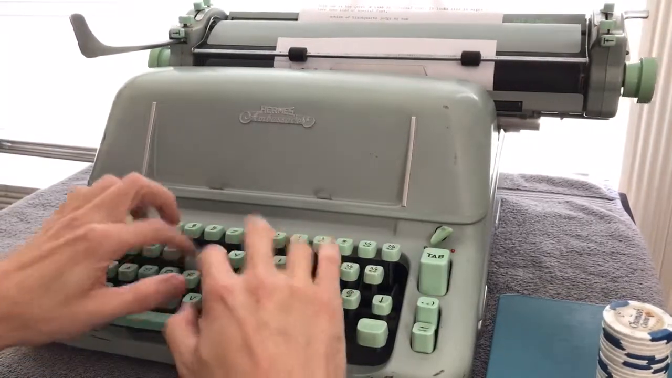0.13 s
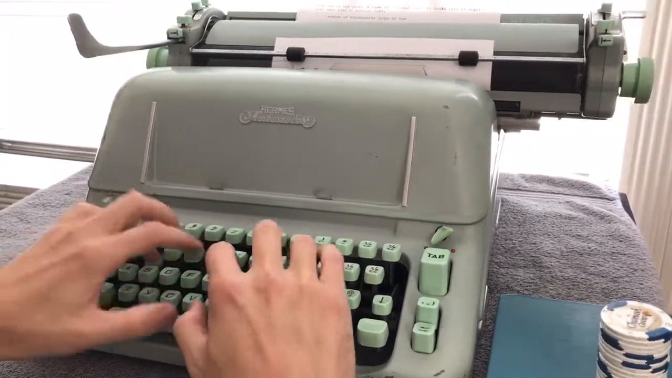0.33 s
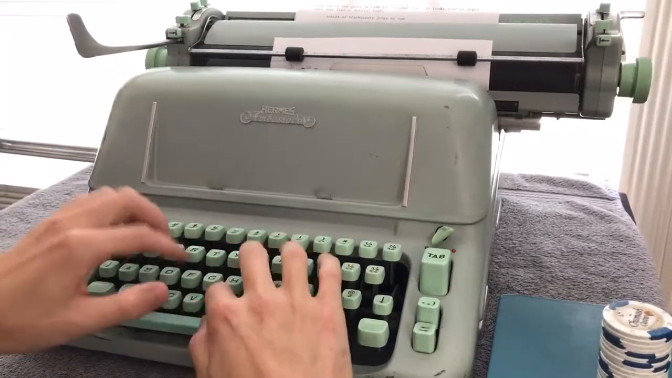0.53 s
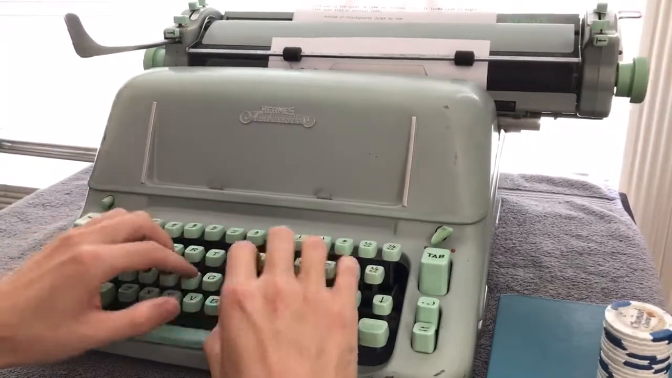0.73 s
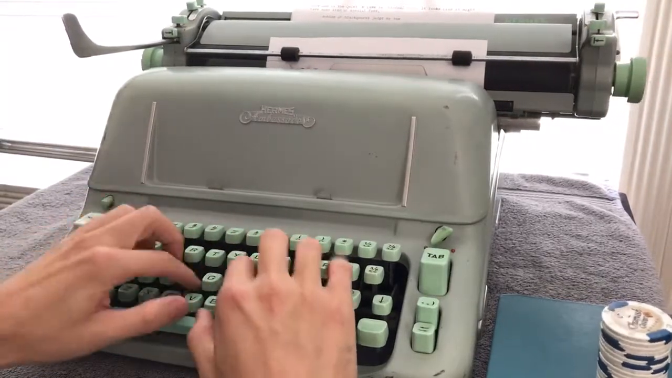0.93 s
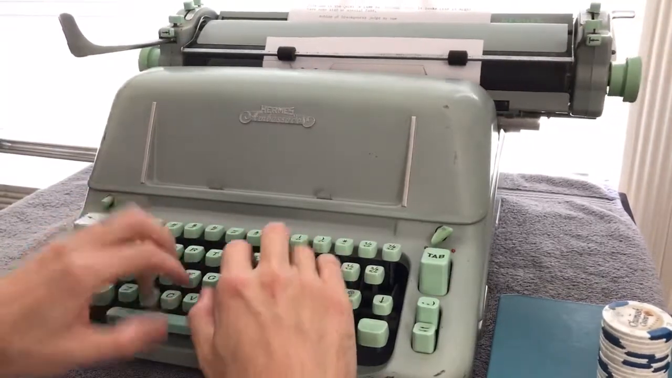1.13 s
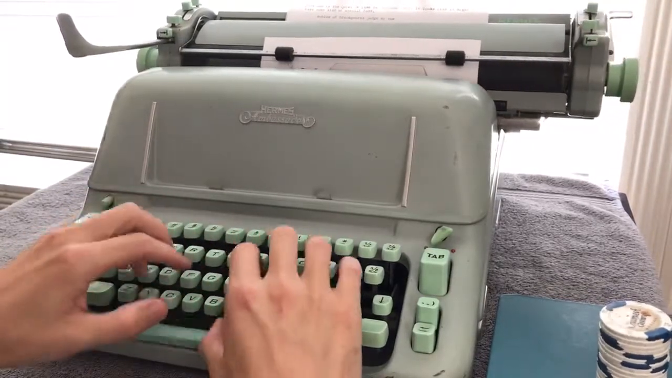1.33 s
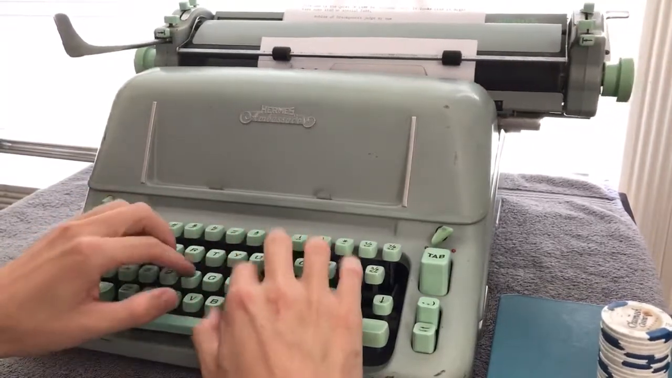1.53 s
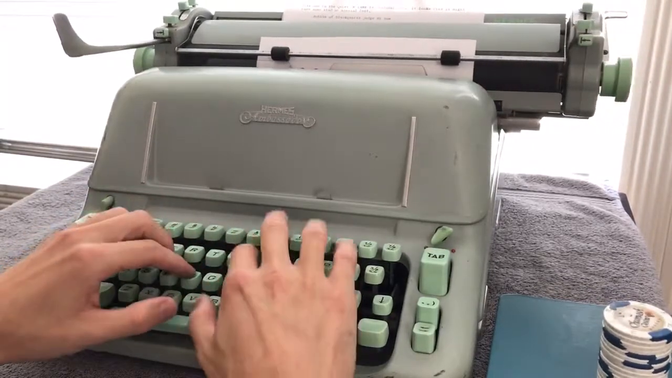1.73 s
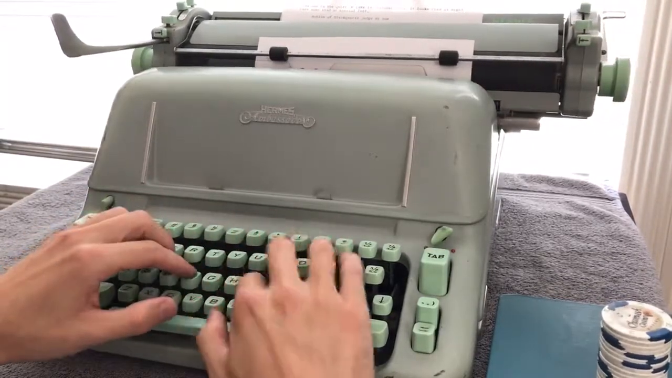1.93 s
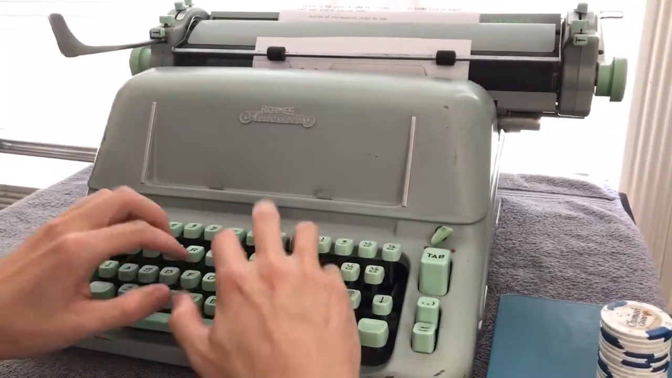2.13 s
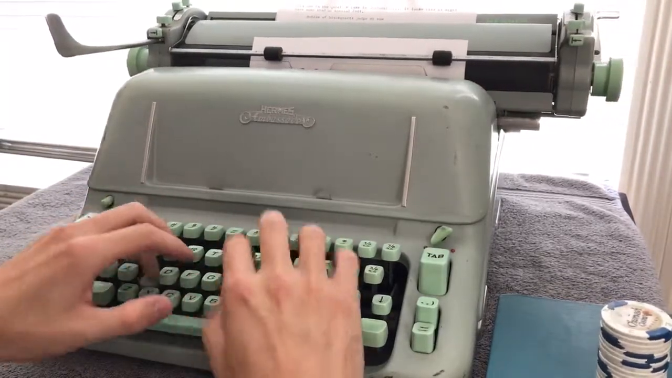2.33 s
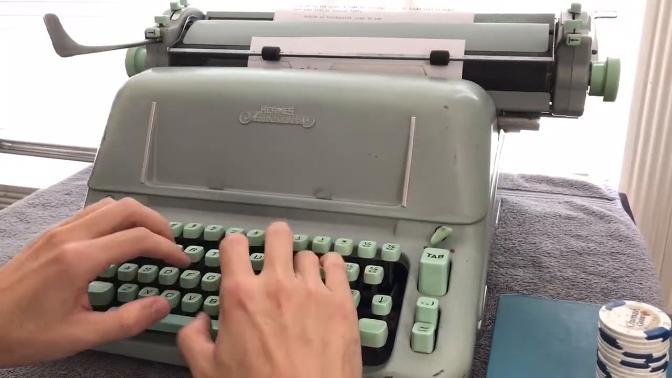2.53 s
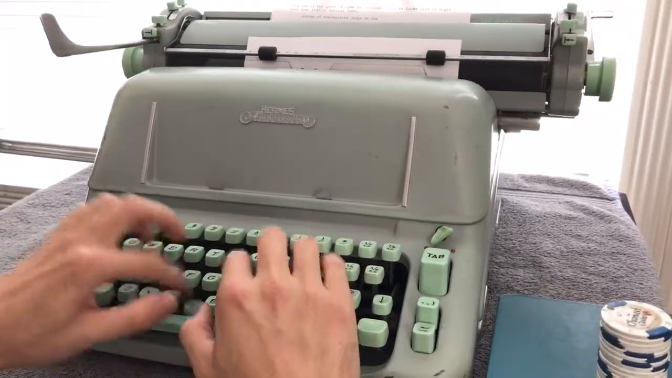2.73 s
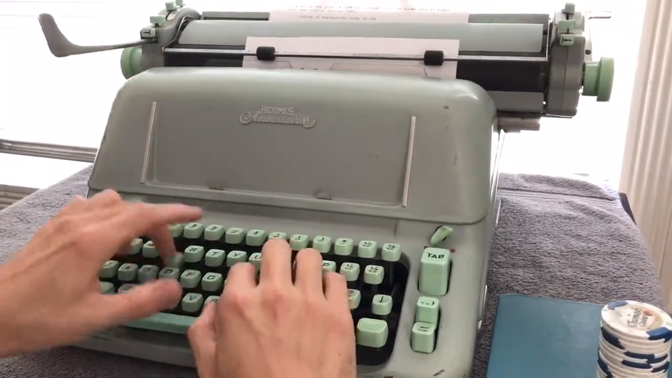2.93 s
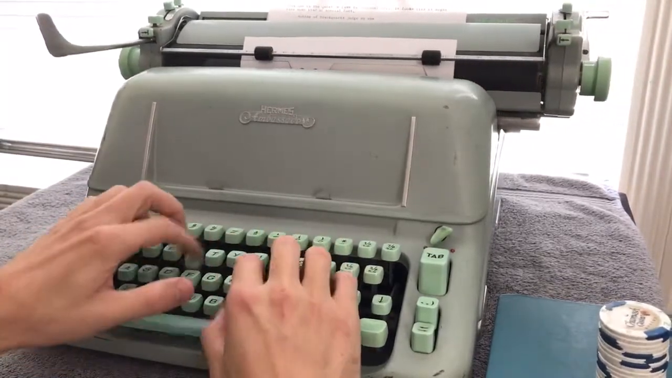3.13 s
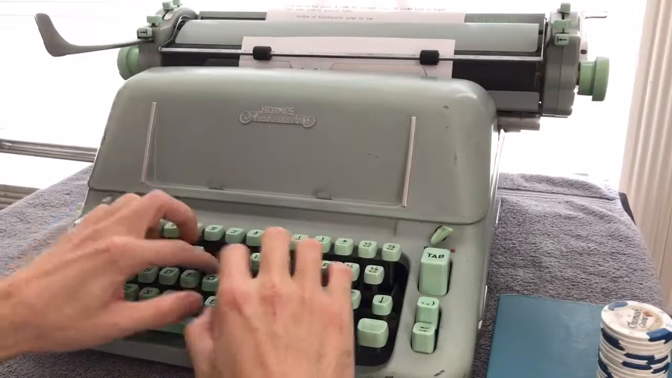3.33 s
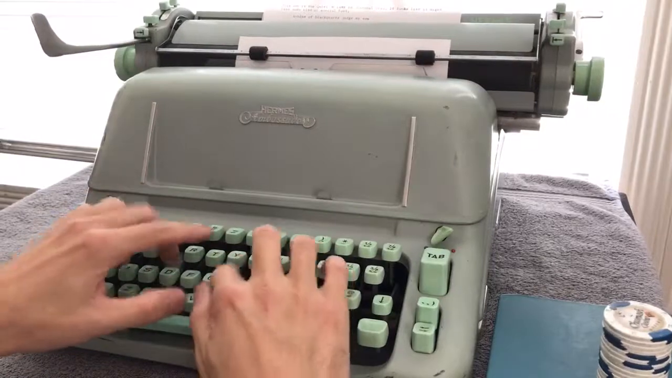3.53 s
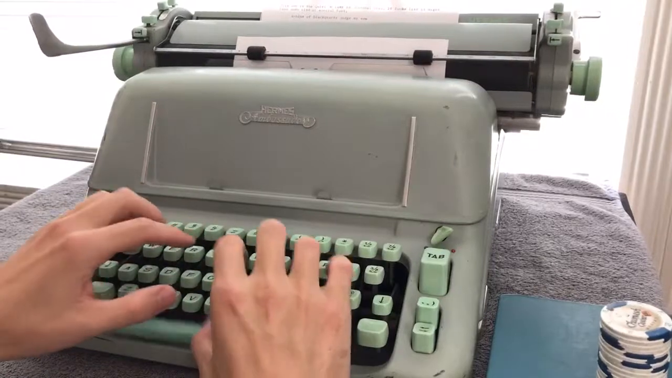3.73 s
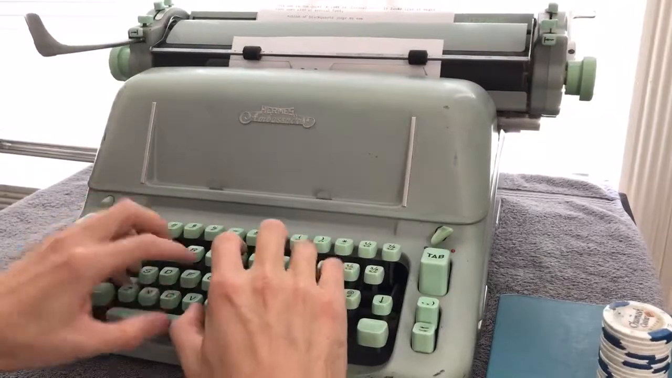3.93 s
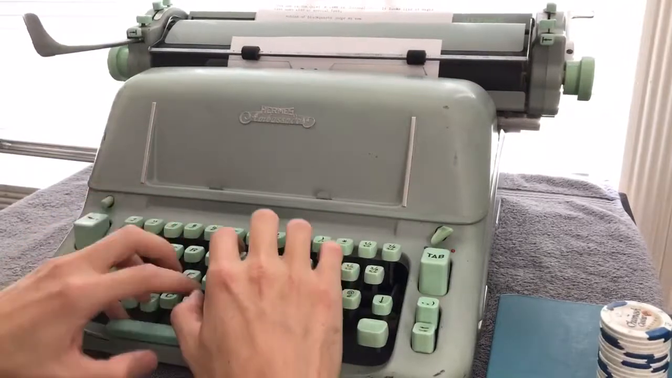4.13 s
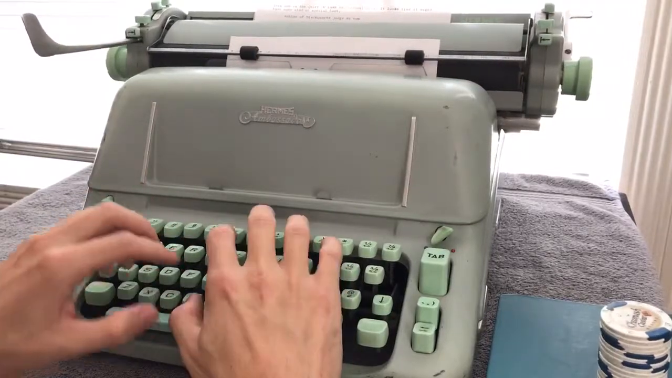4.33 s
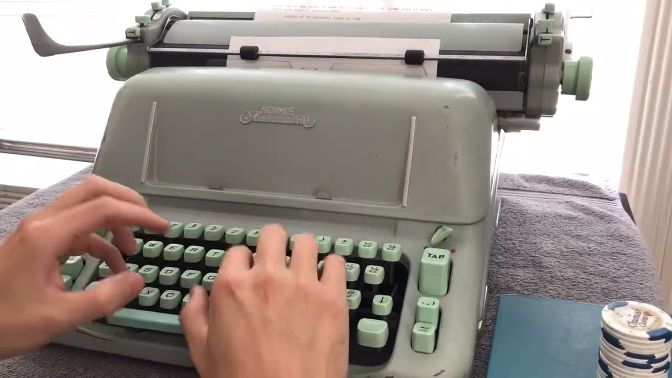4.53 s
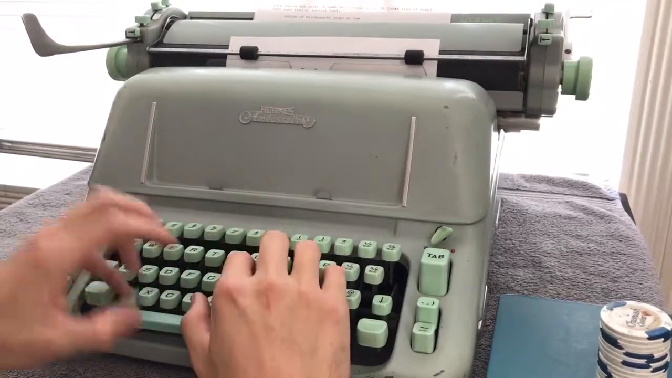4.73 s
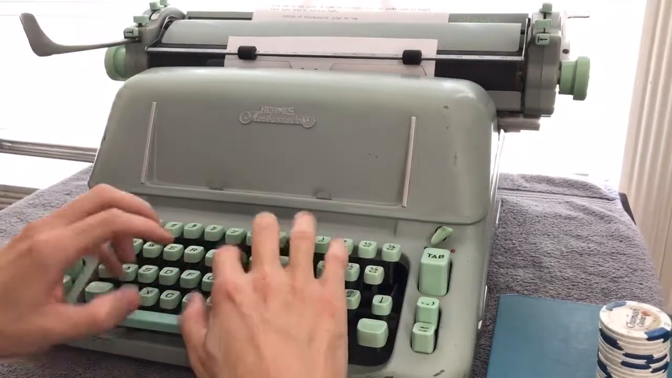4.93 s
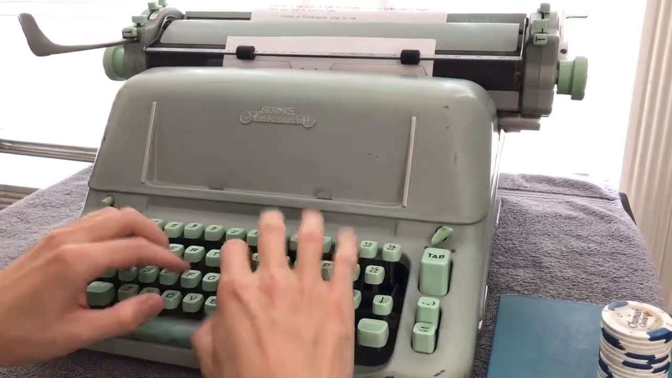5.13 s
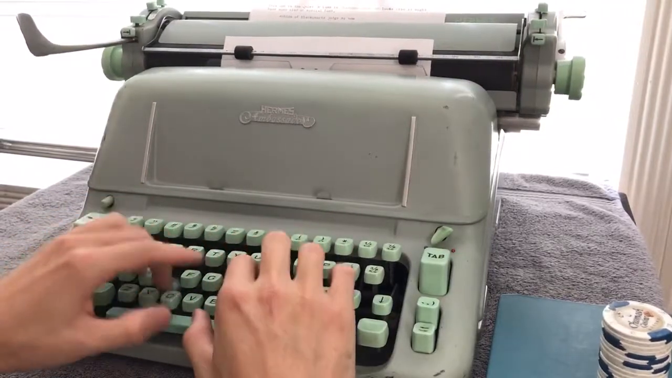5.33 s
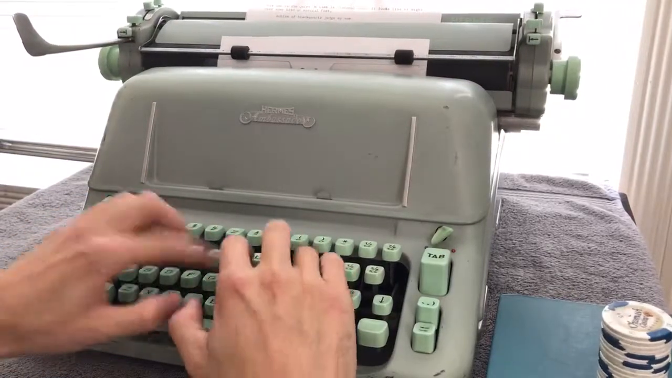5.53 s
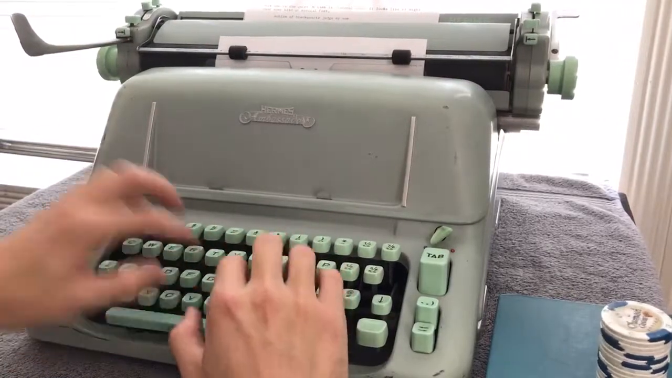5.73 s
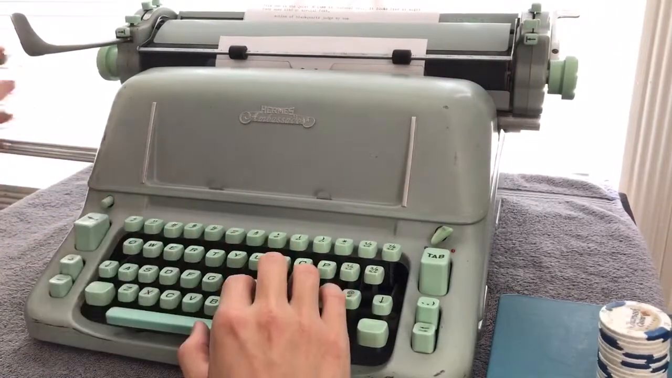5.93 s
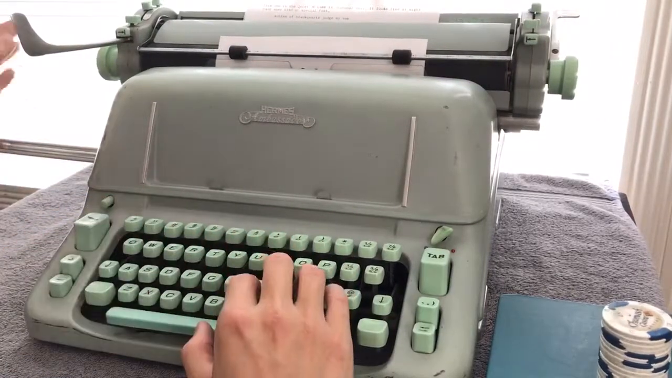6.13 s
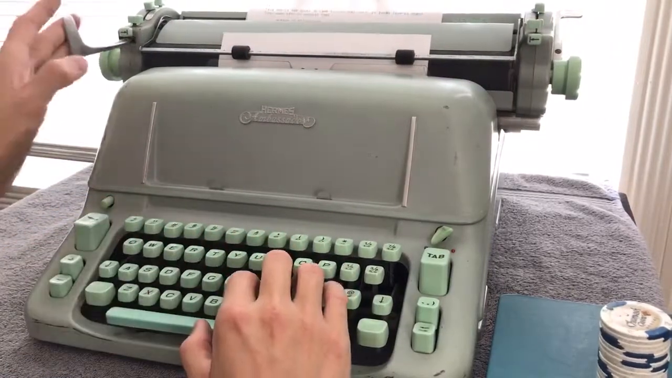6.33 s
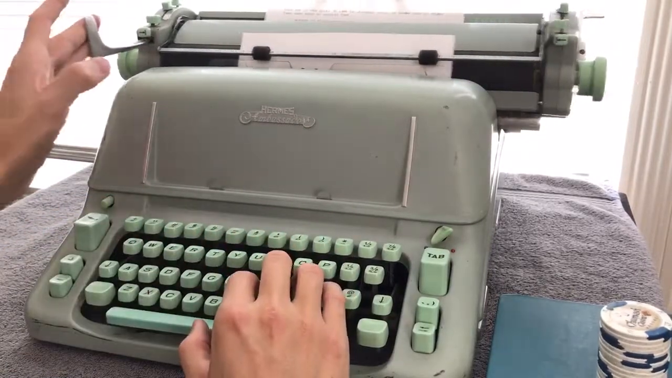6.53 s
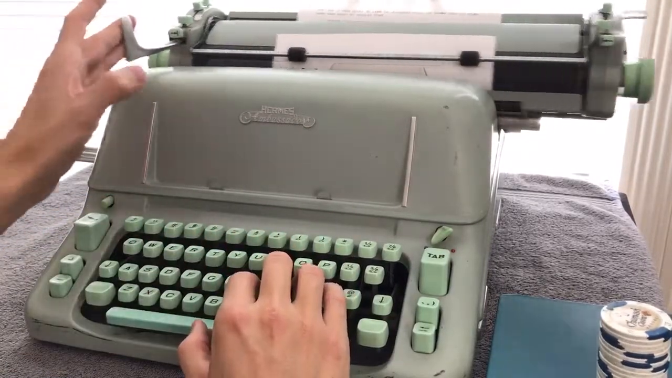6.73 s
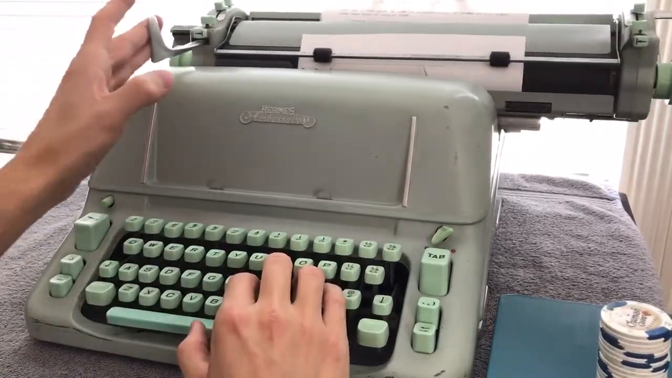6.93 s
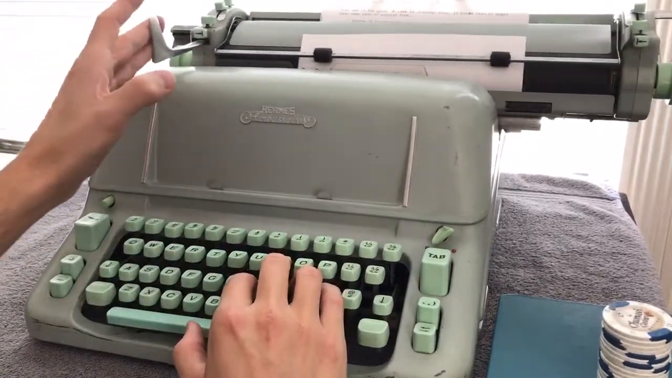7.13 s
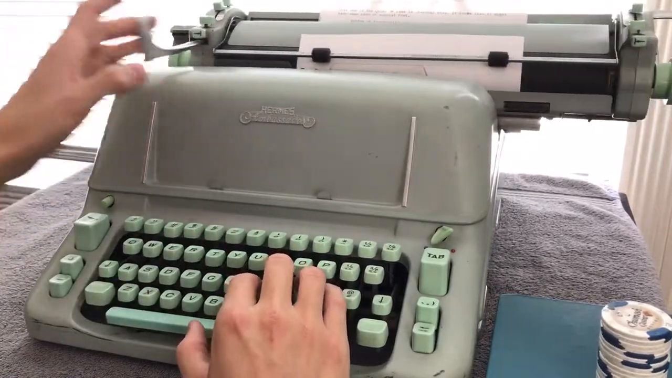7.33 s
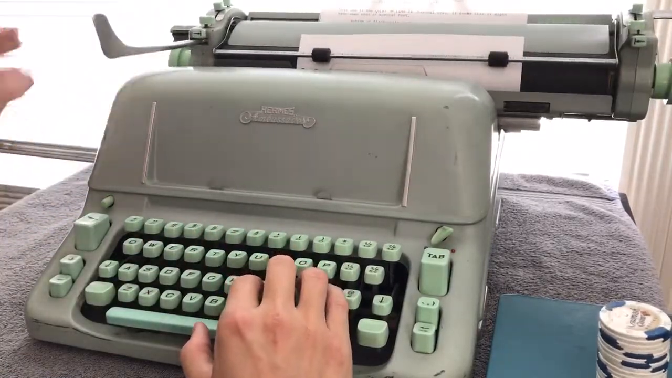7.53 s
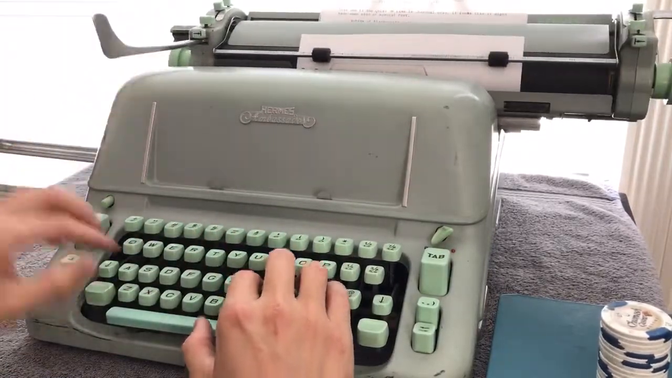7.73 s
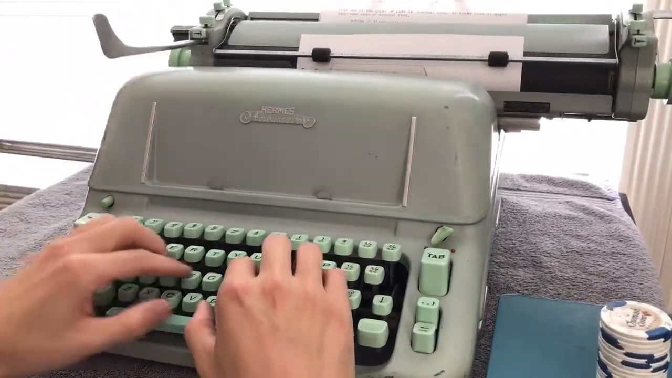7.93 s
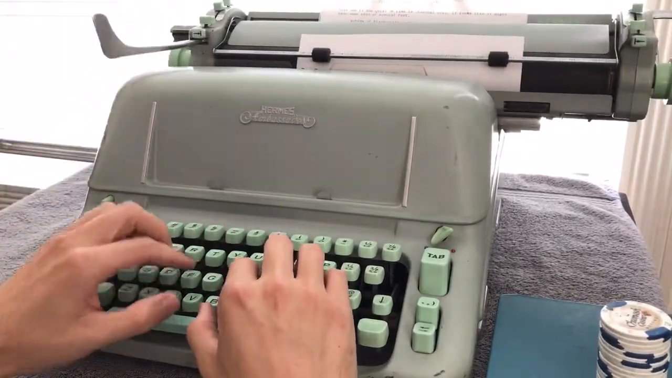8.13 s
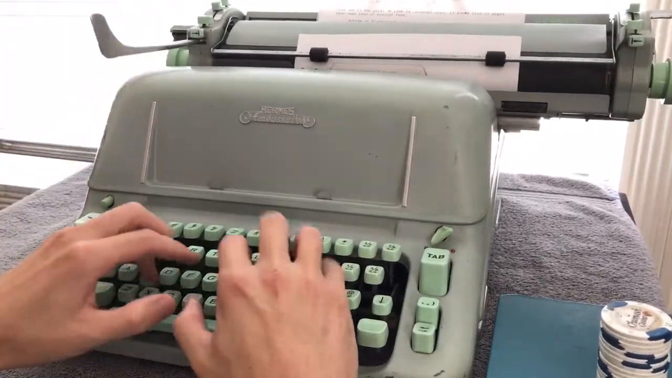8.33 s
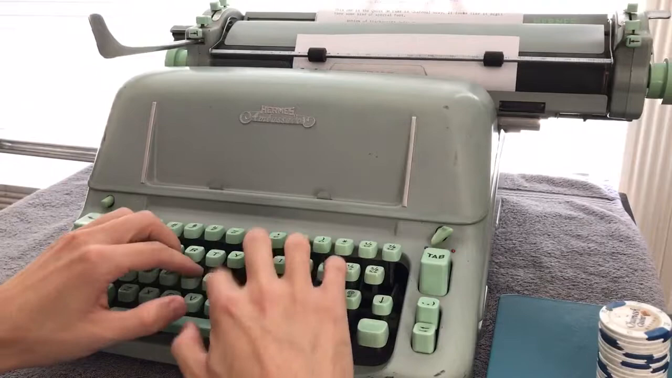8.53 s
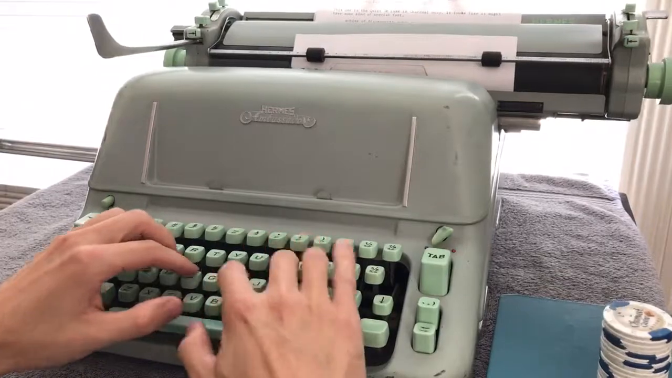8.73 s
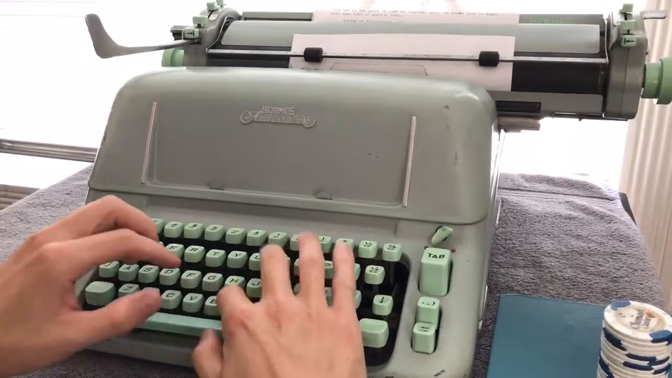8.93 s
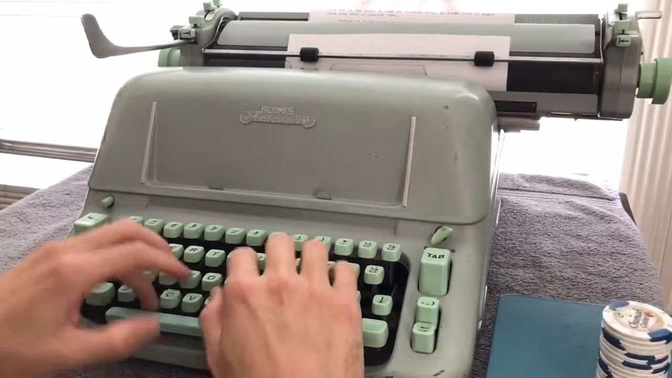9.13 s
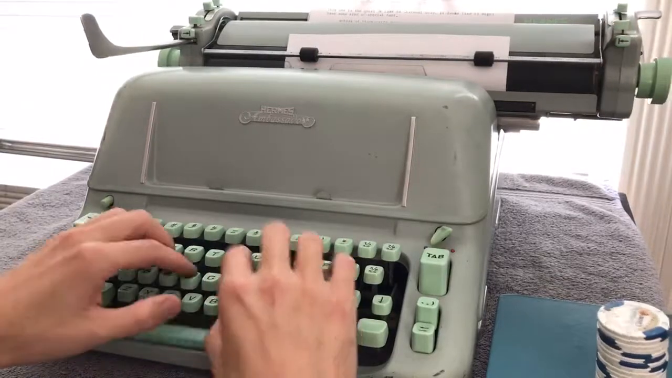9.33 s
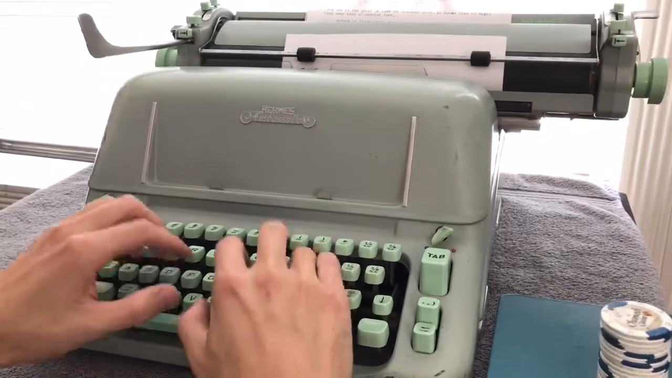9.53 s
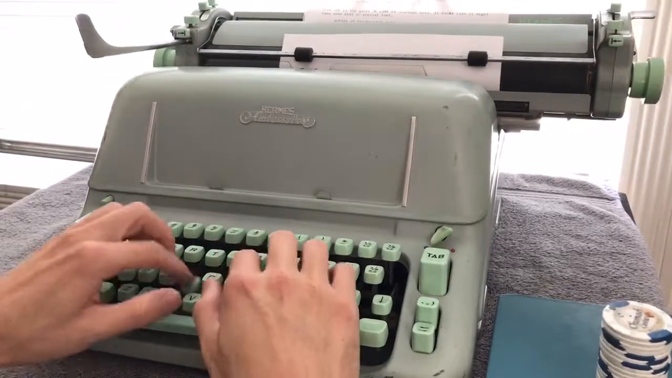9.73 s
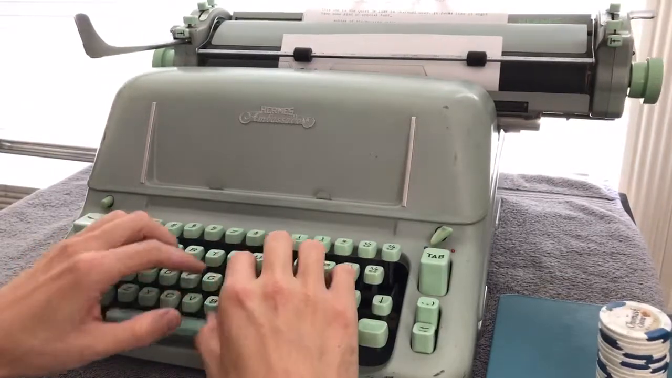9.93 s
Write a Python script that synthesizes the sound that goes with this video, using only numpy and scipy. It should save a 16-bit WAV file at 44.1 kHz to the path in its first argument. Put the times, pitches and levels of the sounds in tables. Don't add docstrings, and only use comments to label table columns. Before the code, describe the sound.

A heavy manual typewriter, closely miked in a small room. Rapid, uneven typebar cracks hit the platen, each bright and steely with a brief frame rattle and low case thud. Softer space-bar clunks sit between words. Typing stops for a lever clack, a short carriage whir and hard metal stops, then resumes with another quick burst over faint low room air.

```python
import sys
import numpy as np
from scipy import signal
from scipy.fft import rfft, irfft
from scipy.io import wavfile
from scipy.ndimage import uniform_filter1d

SR = 44100
rng = np.random.default_rng(int(sys.argv[2]) if len(sys.argv) > 2 else 0)


def linear_from_db(decibels):
    return 10 ** (np.asarray(decibels, float) / 20)


def transcribe(signal):
    frames = np.atleast_2d(signal).T
    limited = np.clip(frames, -1, 1)
    pcm = np.round(limited * 32767).astype(np.int16)
    wavfile.write(sys.argv[1], SR, pcm)


N = 440559

# start_s, peak_db, bar_pitch_hz, platen_knock_db (under the peak)
FIRST_LINE = [(0.0004, -5.5, 4320, -21), (0.1222, -4, 4320, -25), (0.27, -1.5, 4320, -19),
              (0.4313, -1, 4320, -23), (0.6171, -3.5, 4320, -18.5), (1.019, -0.5, 4320, -19),
              (1.1462, -2, 4320, -17.5), (1.272, -1.5, 4320, -17.5), (1.5817, -2, 4320, -15.5),
              (1.7943, 1, 4100, -17), (2.009, -2.5, 4040, -15.5), (2.1852, 0.5, 4080, -17.5),
              (2.3348, -2.5, 4030, -17.5), (2.6191, -3, 4000, -13.5), (2.7337, 1.5, 5800, -20),
              (2.9379, -1.5, 5400, -16.5), (3.1104, -0.5, 5240, -17.5), (3.4105, -3, 3920, -16.5),
              (3.5324, -3.5, 5400, -18.5), (3.6415, -2, 5300, -19.5), (3.916, -4, 5220, -14.5),
              (4.0013, -0.5, 5360, -19.5), (4.866, -2, 5170, -18), (5.066, -1, 5200, -17),
              (5.436, -0.5, 5270, -21), (5.5546, -4, 5080, -15), (5.683, -0.5, 5060, -20.5)]
# start_s, peak_db, bar_pitch_hz, platen_knock_db (under the peak)
SECOND_LINE = [(8.333, -4, 5140, -16.5), (8.4624, -4.5, 5300, -23), (8.6385, -2.5, 4320, -19),
               (8.8142, -2, 5250, -19), (9.0127, -0.5, 4320, -20), (9.1493, -1.5, 4320, -19.5),
               (9.5798, -1, 4320, -19.5), (9.7253, -3, 4320, -22.5)]
STROKES = FIRST_LINE + SECOND_LINE
# press_s, press_db, spring_back_s, return_db, shake_s
SPACES = [(0.799, -33.5, 0.8974, -26.5, 0.044), (1.4155, -32.5, 1.512, -24.5, 0.052),
          (2.466, -33.5, 2.5571, -22.5, 0.041), (3.263, -35, 3.372, -25.5, 0.05),
          (3.763, -35, 3.8496, -24.5, 0.047), (4.182, -30, 4.2872, -30, 0.08),
          (5.234, -34.5, 5.3323, -24, 0.053), (9.3955, -35, 9.4729, -25, 0.052)]
# pitch_hz, width_hz, level_db
CASE = [(155, 30, -10), (208, 22, -6), (258, 20, -2), (318, 20, 1), (402, 24, -3)]
# pitch_hz, width_hz, level_db
COVER = [(619, 110, -6.5), (809, 50, -2), (1078, 620, -9.5), (1300, 500, -12)]
# pitch_hz, level_db (per Hz)
RUSTLE = [(350, -15), (600, 0), (1040, -2), (2090, -3), (8960, -15.5), (10400, -21), (15000, -8.5),
          (15800, -17.5), (16500, -50)]
FRAME_T60_S = 0.37


def rms_one(x):
    return x / np.sqrt(np.mean(x ** 2) + 1e-20)


def coloured(x, spectrum):
    hz, level_db = np.transpose(spectrum)
    grid = np.fft.rfftfreq(len(x), 1 / SR) + 1
    gain = linear_from_db(np.interp(np.log(grid), np.log(hz), level_db))
    return rms_one(irfft(rfft(x) * gain, len(x)))


def resonate(x, modes, spread_db=0.):
    out, luck = 0, rng.standard_normal(len(modes))
    for k, (hz, width, level_db) in enumerate(modes):
        r = np.exp(-np.pi * width / SR)
        poles = [1, -2 * r * np.cos(2 * np.pi * hz / SR), r * r]
        ring = signal.lfilter([(1 - r * r) / 2, 0, (r * r - 1) / 2], poles, x + 1e-18)
        out = out + (-1) ** k * linear_from_db(level_db + spread_db * luck[k]) * ring
    return out


def grains(size, spread_db):
    strength_db = spread_db * np.minimum(rng.exponential(1, size), 4)
    return rms_one(rng.standard_normal(size) * linear_from_db(strength_db))


def lumps(size, per_s, depth_db):
    knots = rng.standard_normal(size // 40 + 2)
    return linear_from_db(depth_db * np.interp(np.arange(size) * per_s / SR, np.arange(len(knots)), knots))


def evened(x, window_s):
    return x / np.sqrt(uniform_filter1d(x ** 2, size=max(int(window_s * SR), 1)) + 1e-20)


def add(out, sound, s):
    at = int(round(s * SR))
    out[at:at + len(sound)] += sound[:N - at]


def in_time(rows, outside_db):
    s, level_db = np.transpose(rows)
    return np.interp(np.arange(N) / SR, s, level_db, outside_db, outside_db)


def air():
    # pitch_hz, level_db (per Hz)
    spectrum = [(41, -32), (70, 6.5), (156, -4.5), (219, -1), (560, -19), (628, -13.5), (885, -32),
                (8500, -36.5), (10400, -37.5), (15100, -31.5), (16500, -44.5)]
    return linear_from_db(-63.5) * coloured(rng.standard_normal(N), spectrum)


def room(x):
    # pitch_hz, t60_s
    decay = [(200, 1), (1000, 0.53), (4000, 0.39), (10000, 0.17), (16000, 0.067)]
    t, edges = np.arange(SR // 2) / SR, 80 * 2 ** np.arange(0, 8.1, .5)
    hz, t60 = np.transpose(decay)
    echo = np.zeros(len(t))
    for low, high in zip(edges, edges[1:]):
        half_octave = signal.butter(2, [low, high], "band", fs=SR, output="sos")
        band = signal.sosfilt(half_octave, rng.standard_normal(len(t)))
        echo += band * linear_from_db(-60 * t / np.interp(np.log(low * high) / 2, np.log(hz), t60))
    echo = echo * np.clip((t - .003) / 0.0064, 0, 1)
    return linear_from_db(-17) * signal.fftconvolve(x, echo / np.sqrt(np.sum(echo ** 2)))[:N]


def blows():
    # start_s, peak_db, shake_s
    bumps = [(0.177, -39, 0.017), (0.676, -38, 0.034), (1.002, -47, 0.031), (1.867, -35, 0.0076),
             (6.042, -52.5, 0.087), (6.325, -36, 0.035), (7.028, -38, 0.02), (7.381, -41, 0.022),
             (7.492, -31, 0.024), (8.028, -55, 0.023), (9.937, -38.5, 0.042)]
    bottoms = [(s + 0.00486, -34, 0.027, 2.5) for s, *_ in STROKES]
    fingers = [(s - 0.036, -45, .015, 6) for s, *_ in STROKES[1:]]
    down = [(s + .004, db, .03, 3.5) for s, db, *_ in SPACES]
    up = [(s + .007, db, shake_s, 1) for _, _, s, db, shake_s in SPACES]
    return bottoms + fingers + down + up + [(*bump, 4) for bump in bumps]


def desk():
    push = np.zeros(N)
    for s, *_ in STROKES:
        push_db = -34.0 + 4.9 * rng.standard_normal()
        add(push, linear_from_db(push_db) * np.diff(np.hanning(500)) * 60, max(s - .035, 0))
    for s, peak_db, *_ in blows():
        add(push, linear_from_db(peak_db - 2.5) * np.hanning(200), s)
    boom = resonate(resonate(push, [(48.3, 19, 3.5), (114, 17, -22.0)]), [(55.6, 120, 0)])
    hum = resonate(resonate(rng.standard_normal(N), [(55.6, 5.9, 0)]), [(55.7, 16, 0)])
    return boom + linear_from_db(-63) * evened(hum, window_s=0.31)


def hush():
    dip_db = np.zeros(N)
    for _, _, s, *_ in SPACES:
        add(dip_db, -8.0 * np.sin(np.linspace(0, 2.4, 3000)), s - .068)
    return linear_from_db(np.maximum(dip_db, -10))


def stroke(level_db, hold_s, t60):
    out, t = np.zeros(N), np.arange(SR // 2) / SR
    rise_s, lead_s = .04, .075
    fall = linear_from_db(level_db - 60 * np.maximum(t - rise_s - hold_s, 0) / t60)
    swell = np.minimum(t / rise_s, 1) ** 2 * fall
    for s, *_ in STROKES:
        add(out, swell ** 2, max(s - lead_s, 0))
    return np.sqrt(out)


def linkage():
    # start_s, level_db
    hands = [(0, -54), (1.5, -50), (4.3, -48), (4.5, -67.5), (4.79, -73), (4.9, -51.5), (5.8, -49),
             (6.07, -65.5), (6.43, -62), (6.76, -54.5), (7.37, -64), (7.54, -50), (7.74, -78),
             (8.05, -70.5), (8.27, -71), (8.4, -55), (9.8, -49.5), (9.99, -59.5)]
    hands_db, jiggle_db = in_time(hands, None), 1.8
    rustle = coloured(grains(N, spread_db=3.5), RUSTLE)
    rustle = rustle * lumps(N, per_s=240, depth_db=jiggle_db) * hush()
    noise = rng.standard_normal(N)
    body = resonate(noise, CASE + [(132.0, 86, 0.00093)])
    rumble = rms_one(body + 0.45 * resonate(noise, COVER))
    rumble = rumble * lumps(N, per_s=40, depth_db=jiggle_db) * hush()
    rub = linear_from_db(hands_db) + stroke(-51, hold_s=0.15, t60=0.04)
    hum = linear_from_db(-51.5 + .8 * (hands_db + 49.5)) + stroke(-52.5, hold_s=0.15, t60=0.47)
    return rub * rustle + hum * rumble


def carriage():
    # start_s, level_db
    glide = [
        (6.47, -87),
        (6.504, -65),
        (6.55, -58.5),
        (6.74, -51),
        (6.75, -47.5),
        (7.0, -58.5),
    ]
    # pitch_hz, level_db (per Hz)
    rail = [(120, -40), (200, -19), (396, -2.5), (434, -2.5), (1390, -19), (1500, -35.5), (3190, -17),
            (8180, -25.5), (11400, -22), (15600, -37.5), (16500, -39)]
    whir = coloured(grains(N, spread_db=4.5), rail) * lumps(N, per_s=45, depth_db=3.0)
    return linear_from_db(in_time(glide, -120)) * whir


def springs():
    # start_s, level_db
    low_sings = [(5.16, 0), (7.04, -3), (2.40, -3), (3.66, -5), (4.3, -6), (5.78, -6)]
    # start_s, level_db
    high_sings = [(4.08, 2), (5.12, 2), (2.78, 3), (.9, 0), (3.66, 2), (.67, 3), (1.18, 1), (1.33, 3),
                  (3.17, 1)]
    out, t = np.zeros(N), np.arange(8820) / SR
    for hz, line_db, sings in ((9055, -59.5, low_sings), (12963, -59, high_sings)):
        tone = np.sin(2 * np.pi * hz * t) * np.hanning(len(t)) ** .3
        for s, level_db in sings:
            add(out, linear_from_db(line_db + level_db + 6 - 60 * t / 1.1) * tone, s)
    return out


def thuds():
    out, t = np.zeros(N), np.arange(11025) / SR
    for s, peak_db, shake_s, clatter_db in blows():
        shake = rng.standard_normal(len(t) + 2048)
        boom = evened(resonate(shake, CASE, spread_db=1.0), window_s=0.016)[-len(t):]
        clatter = evened(resonate(shake, COVER, spread_db=2.5), window_s=0.026)[-len(t):]
        past = np.maximum(t - shake_s, 0)
        ring_out = 0.61 * linear_from_db(-60 * past / 0.037) + 0.45 * linear_from_db(-60 * past / 0.28)
        body = (1 - np.exp(-t / .003)) * ring_out
        thud = body * (boom + linear_from_db(clatter_db - 60 * t / 0.21) * clatter)
        add(out, linear_from_db(peak_db - 7.0) * thud, s - .004)
    return out


def contacts():
    # start_s, peak_db, pitch_hz,
    # t60_s
    loose = [(0.5716, -21, 14000, 0.035), (0.8779, -34, 2940, 0.047), (0.9672, -27, 3430, 0.065),
             (1.5364, -23, 3770, 0.081), (1.93, -27, 3020, 0.048), (2.9128, -37, 5260, 0.06),
             (3.3623, -31, 2800, 0.07), (3.783, -26.5, 14000, .025), (4.2144, -34, 2710, 0.046),
             (4.2872, -17.5, 3220, .05), (4.3181, -22.5, 3750, 0.39), (4.5191, -41, 2965, 0.044),
             (4.6274, -44, 3230, 0.096), (4.8085, -27.5, 8540, 0.18), (5.351, -25.5, 13500, 0.25),
             (8.0187, -36.5, 11200, 0.11), (8.155, -48, 11070, 0.068), (8.2886, -31, 3680, 0.14),
             (8.9516, -22, 14500, 0.042), (9.4124, -32, 2790, 0.043), (9.4983, -25.5, 3590, 0.18),
             (9.5362, -26, 3050, 0.15), (9.9438, -32.5, 4320, 0.038)]
    # start_s, peak_db, pitch_hz, t60_s
    lever = [(5.9989, -40, 2680, 0.047), (6.0637, -41, 2820, 0.053), (6.252, -28.5, 2720, 0.098),
             (6.3014, -16, 2840, 0.24), (6.335, -11, 4140, 0.081), (6.3524, -19, 3680, 0.065),
             (7.013, -13, 2990, 0.19), (7.3025, -43, 2900, 0.023), (7.3567, -29.5, 5260, 0.072),
             (7.3776, -33.5, 3720, 0.17), (7.428, -28, 3340, 0.06), (7.441, -21.5, 3300, 0.12),
             (7.4884, -12.5, 2870, 0.15), (7.6001, -37, 2700, 0.053), (7.738, -42, 2690, 0.024),
             (7.7837, -52, 2760, 0.035)]
    settles = [(s + 0.081, -31, 1500, .075) for s, *_ in STROKES]
    falls = [(s + .138, -34.5, 13500, .04) for s, *_ in STROKES]
    down = [(s, db + 1.7, 7200, 0.036) for s, db, *_ in SPACES]
    up = [(s, db + 0.27, 2500, .13) for _, _, s, db, _ in SPACES]
    return loose + lever + settles + falls + down + up


def ticks():
    # pitch_hz, level_db (per Hz)
    spray = [(290, -24), (500, -4.5), (2430, -2.5), (7490, -12), (8540, -9), (11300, -15), (15100, -10),
             (16500, -37)]
    out, t = np.zeros(N), np.arange(8192) / SR
    for s, peak_db, hz, t60 in contacts():
        noise = grains(len(t), spread_db=5.5)
        ring_db = 1 - 0.3 * (peak_db + 32.5) + 9 * (hz > 10000)
        tick = coloured(noise, spray) + linear_from_db(ring_db) * resonate(noise, [(hz, 0.25 * hz, 0)])
        decay = linear_from_db(-60 * t / max(t60, .004)) + linear_from_db(-12.5 - 60 * t / FRAME_T60_S)
        tick = tick * lumps(len(t), per_s=230, depth_db=2.5) * decay
        add(out, linear_from_db(peak_db) * tick / np.abs(tick).max(), s)
    return out


def strikes():
    # pitch_hz, width_hz, level_db
    bar = [(2500, 2700, -12.5), (3340, 200, 0), (3750, 390, -0.5), (4320, 180, 4.5), (5060, 220, -6),
           (6480, 820, -11.5), (7850, 1700, -6), (8365, 4400, -1), (12500, 750, -6.5), (14800, 3500, -13)]
    # pitch_hz, width_hz, level_db
    basket = [(2720, 120, -8), (3780, 70, -2), (4320, 45, 1), (5260, 60, -1), (5345, 60, -2),
              (5780, 60, -5), (6390, 60, -4), (7240, 50, -7), (9680, 110, -5), (13000, 70, -8)]
    # pitch_hz, width_hz, level_db
    platen = [(1200, 42, -2.5), (1390, 101, -0.5), (1690, 150, -7), (790, 88, -12.5)]
    # pitch_hz, level_db (per Hz)
    crack_spectrum = [(240, -52.5), (400, -23), (3030, -10.5), (4330, 7), (4830, 0), (5380, 1.5),
                      (7230, -7.5), (11500, -1), (15000, -19), (16500, -65.5)]
    # pitch_hz, level_db (per Hz)
    rattle_spectrum = [(240, -39), (400, 3), (757, -6.5), (1410, 3), (2080, 0.5), (2840, 4), (3170, 4.5),
                       (4330, 2), (6490, 6.5), (15300, -5), (16500, -36.5)]
    out, t = np.zeros(N), np.arange(16384) / SR
    short = t[:2048]
    press = np.exp(-short / .001) + .6 * np.exp(-(short / .0042) ** 4)
    contact = np.minimum(short / .0002, 1) * press
    tail = linear_from_db(-60 * t / 0.046) + linear_from_db(-8.5 - 60 * t / FRAME_T60_S)
    bounce_s = .026
    tail = tail + .25 * (t > bounce_s) * linear_from_db(-60 * np.abs(t - bounce_s) / .025)
    habit = grains(len(short), spread_db=-1.5)
    for s, peak_db, bar_hz, knock_db in STROKES:
        blow = (.9 * habit + .4 * grains(len(short), spread_db=1.2)) * contact
        blow[8] += 9.0
        steel = coloured(grains(len(short), spread_db=-12.0), crack_spectrum) * contact
        crack = 0.46 * steel + 1.16 * resonate(blow, bar, spread_db=-2.5)
        crack = crack + 2.1 * resonate(blow, [(bar_hz, 400, 0)])
        crack = 0.36 * crack / np.sqrt(np.mean(crack[:160] ** 2))
        knock = resonate(blow * np.exp(-short / 0.0033), platen, spread_db=2.0)
        knock = linear_from_db(knock_db) * knock / np.abs(knock).max()
        add(out, linear_from_db(peak_db) * (crack + knock), s + 0.00039)
        noise = grains(len(t), spread_db=2.0)
        ringing = resonate(noise, basket + [(bar_hz, 300, -5)], spread_db=1.0)
        rattle = rms_one(coloured(noise, rattle_spectrum) + 2.4 * ringing)
        rattle = rattle * lumps(len(t), per_s=230, depth_db=2.0)
        add(out, linear_from_db(-18.5) * rattle * (1 - np.exp(-t / 0.0024)) * tail, s)
        ribbon = coloured(noise[-len(short):], RUSTLE) * linear_from_db(-60 * short / 0.45)
        add(out, linear_from_db(-37.5) * ribbon, max(s - .014, 0))
    return out


def scene():
    machine = strikes() + ticks() + thuds()
    moving = springs() + linkage() + carriage()
    return (machine + room(machine) + moving + desk() + air())[None]


def roll_off(x):
    return signal.sosfilt(signal.butter(12, 16860, fs=SR, output="sos"), x)


def record(dry):
    top_cut = signal.cheby2(8, 24, 16000, fs=SR, output="sos")
    dull = signal.sosfilt(top_cut, dry)
    return roll_off(0.82 * np.tanh(dull / 1.026))


dry = scene()
out = record(dry)
transcribe(out)
```